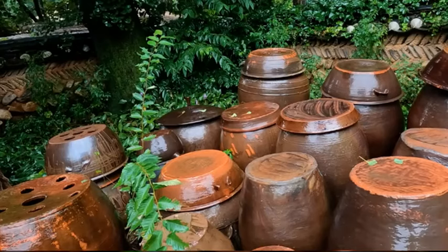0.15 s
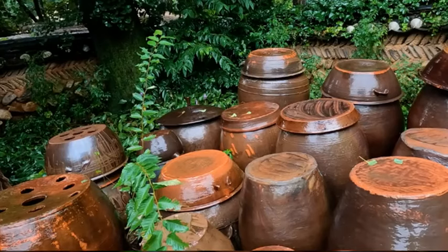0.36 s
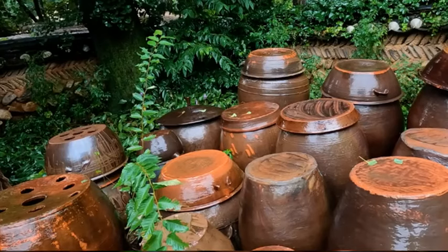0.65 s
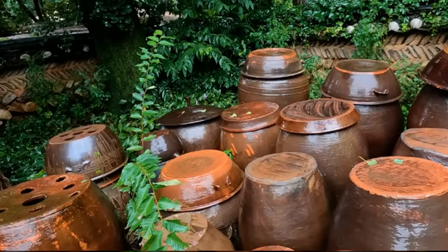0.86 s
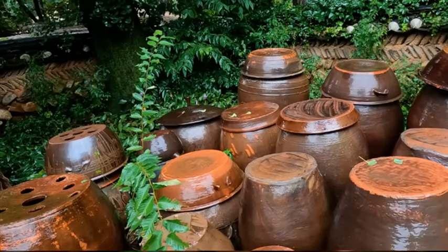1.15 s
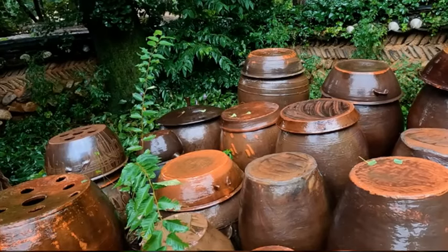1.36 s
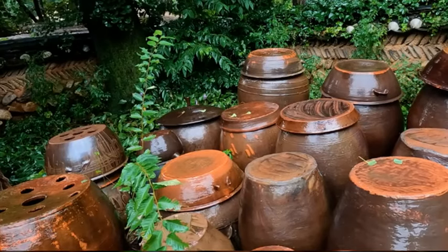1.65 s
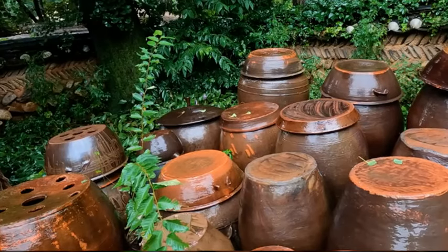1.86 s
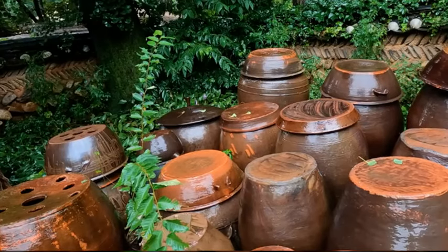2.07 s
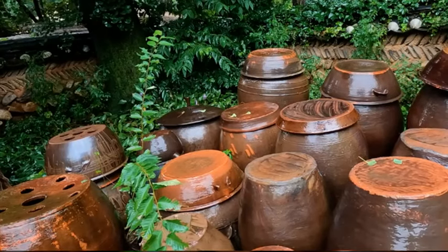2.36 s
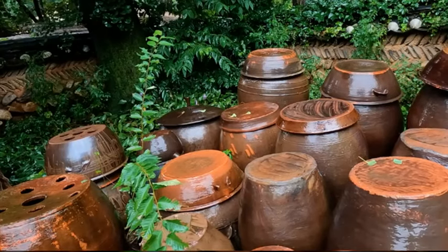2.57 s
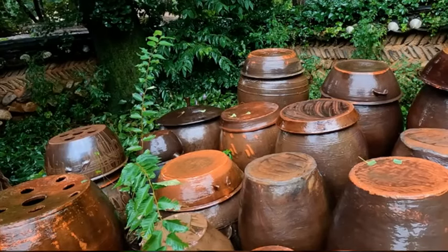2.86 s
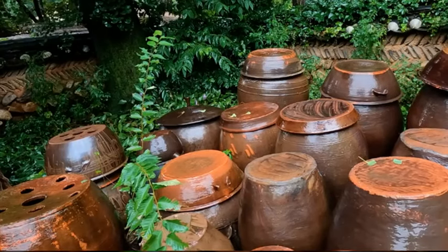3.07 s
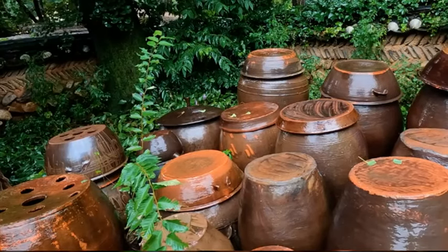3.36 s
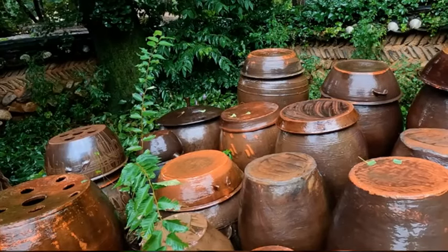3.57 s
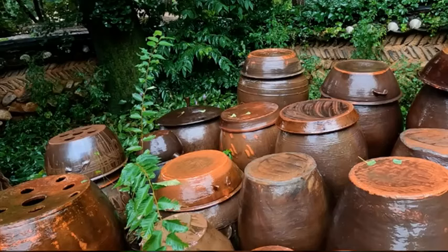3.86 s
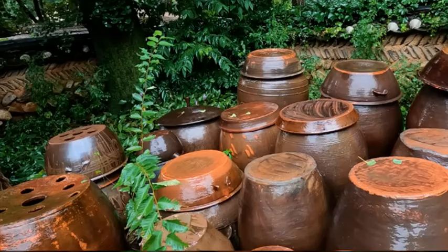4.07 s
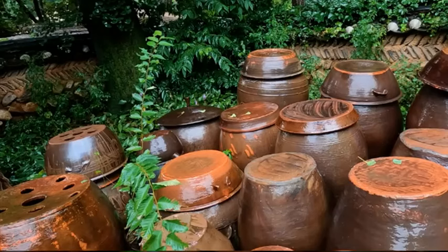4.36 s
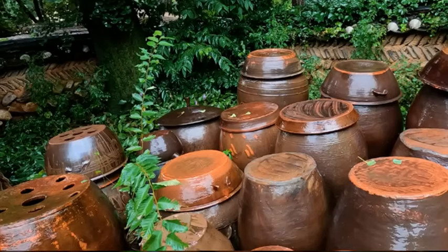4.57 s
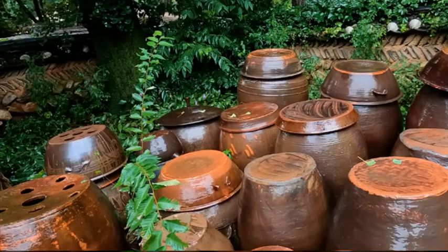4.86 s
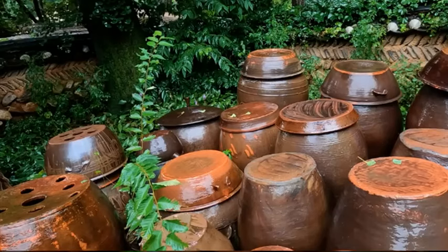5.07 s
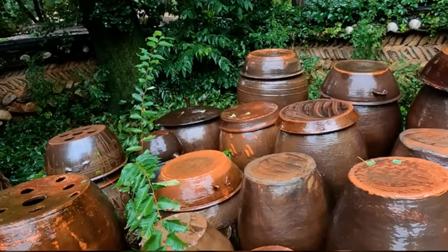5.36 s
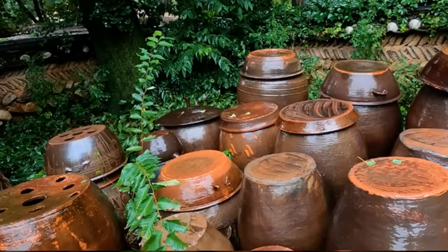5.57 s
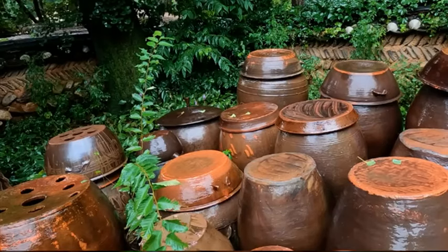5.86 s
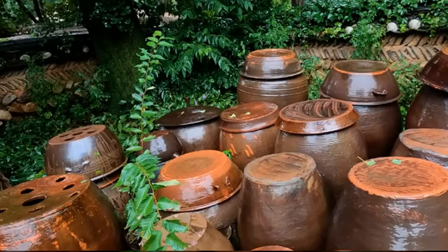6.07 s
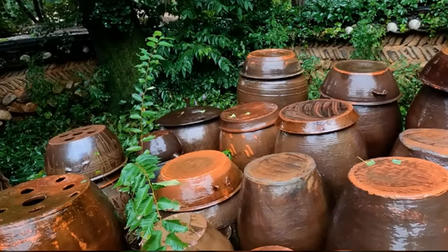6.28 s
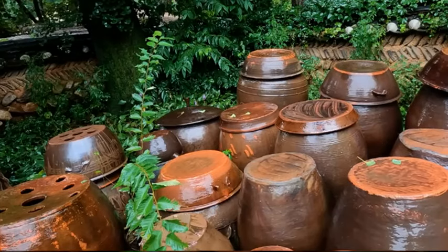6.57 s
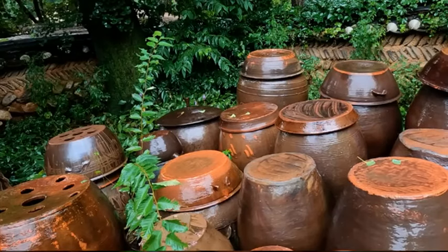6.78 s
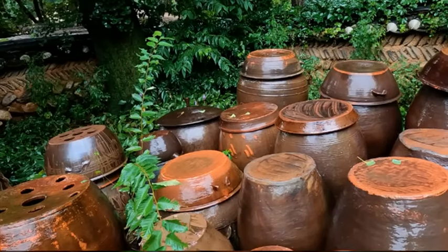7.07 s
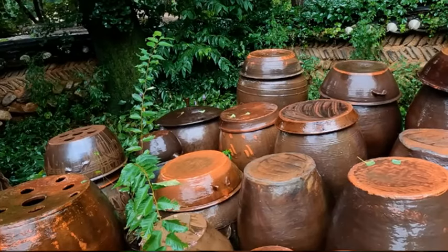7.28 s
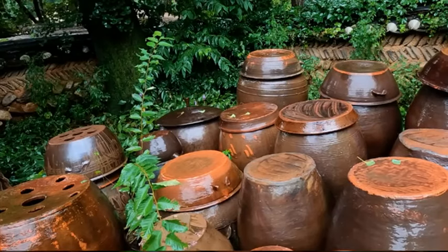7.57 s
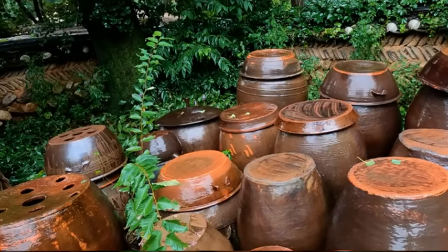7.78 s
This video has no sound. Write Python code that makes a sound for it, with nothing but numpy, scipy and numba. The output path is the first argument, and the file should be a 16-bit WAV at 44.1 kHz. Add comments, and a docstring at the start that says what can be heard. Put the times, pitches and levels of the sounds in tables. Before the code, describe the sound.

For about eight seconds, steady rain falls in a garden of glazed earthenware jars. A broad, even hiss of countless far drops holds nearly constant, overlaid by dense fine crackle on leaves, lids and soil. Close drops tick sharply and irregularly, several per second, each a short dry crack with a tiny knock and a puff of spray; stronger ones land near 0.4, 3.4 and 6.55 s. Trickling water adds small bubble plops, mostly gliding upward, with a clear one at 0.8 s and little splashy clusters near 2.3, 2.9, 3.4, 5.6 and 6.3 s. Soft low thuds come around 4.2, 5.4, 6.4, 7.1 and 7.75 s. A distant low motor hum, faint at first, bumps up at 4.15 s, then swells unevenly from 5.3 s to the end. Wide stereo, close and open, slightly dulled at the very top.

```python
"""A steady hiss of rain runs throughout: far drops merging in a garden of clay jars, heard by a spaced
pair of microphones. Near drops crackle, and tick as short damped rings on wet glaze and leaves; water
that drips and trickles into pools adds bubble plops, mostly gliding up. Low thuds and soft low swells
are three damped tones each. A distant motor, an unsteady tone and rumble, hums low and swells late."""
import sys
import numpy as np
from scipy import signal
from scipy.fft import rfft, irfft
from scipy.io import wavfile
from scipy.ndimage import uniform_filter1d
from numba import njit

SR = 44100
rng = np.random.default_rng(int(sys.argv[2]) if len(sys.argv) > 2 else 0)


def master_out(mix):
    """Clip the mix to full scale and print it as 16-bit PCM to the path in sys.argv[1]."""
    frames = np.transpose(np.atleast_2d(mix))
    ceiling = np.clip(frames, -1, 1)
    pcm = np.round(ceiling * 32767).astype(np.int16)
    wavfile.write(sys.argv[1], SR, pcm)


N = 349713

GLIDE_EASE_S = 0.018  # time constant with which the glide flattens once a ring fades
LEAD_MS_PER_DB = 0.016  # the microphone favoured in level also hears the drop this much earlier


def undb(db):
    """Turn decibels into an amplitude factor."""
    return 10 ** (np.asarray(db) / 20)


def curve(table):
    """Draw straight lines through the timed points of a table, one curve per column."""
    s, *columns = np.transpose(table)
    t = np.arange(N) / SR
    return [np.interp(t, s, c) for c in columns]


def by_hz(table, hz):
    """Read a table of values against frequency, interpolating along log frequency."""
    f, v = np.transpose(table)
    return np.interp(np.log(hz), np.log(f), v)


def walk(rate):
    """Wander at random: levels held 1 / rate s and smoothed twice, with a spread near 1."""
    k = int(SR / rate)
    held = np.repeat(rng.standard_normal(N // k + 1), k)
    smooth = uniform_filter1d(uniform_filter1d(held, k), k)
    return 1.61 * smooth[:N]


def band(lo_hz, hi_hz, channels=2):
    """Filter noise between two edges and scale it to rms 1."""
    sos = signal.butter(2, [lo_hz, hi_hz], "band", fs=SR, output="sos")
    x = signal.sosfilt(sos, rng.standard_normal((channels, N)))
    return x / x.std()


@njit
def ring(start, size, hz, rise, t60, glide, ease):
    """Damped tones that swell for `rise` s, then fade 60 dB in `t60` s; pitch glides in octaves per s."""
    out = np.zeros(N)
    for k in range(len(start)):
        i0, phase = int(start[k] * SR), 0.
        # start off pitch, so that the glide arrives at hz at the peak
        step = 2 * np.pi * hz[k] * 2 ** (-glide[k] * rise[k]) / SR
        up = 2 ** (glide[k] / SR)
        fade = 1000 ** (-1 / (t60[k] * SR))
        g = size[k]
        swell = int(rise[k] * SR) + 1
        for j in range(min(swell + int(t60[k] * SR), N - i0)):
            if j < swell:
                out[i0 + j] += g * np.sin(np.pi * j / swell / 2) * np.sin(phase)
            else:
                g *= fade
                up = 1 + (up - 1) * ease
                out[i0 + j] += g * np.sin(phase)
            phase += step
            step = min(step * up, 2.)
    return out


def grains(s, db, hz, pan_db, rise_ms, t60_ms, glide=0., lag_ms=0.):
    """Place rings between the microphones by level and arrival time; glide in octaves per 10 ms."""
    one = np.ones(len(s))
    ease = np.exp(-1 / (GLIDE_EASE_S * SR))
    rise_s = rise_ms * one / 1000
    t60_s = np.maximum(t60_ms * one, 0.5) / 1000
    octaves_per_s = glide * one * 100
    lag_ms = lag_ms - LEAD_MS_PER_DB * pan_db  # left behind right
    sides = []
    for side in (1, -1):  # left, right
        start = np.clip(s + side * lag_ms / 2000, 0, N / SR)
        size = undb(db + side * pan_db / 2) * one
        sides.append(ring(start, size, hz * one, rise_s, t60_s, octaves_per_s, ease))
    return np.array(sides)


def shower(per_s, db, scatter_db, top_db, lo_hz, hi_hz, cycles, rise_cycles, glide):
    """Scatter random grains all around: many faint, few strong, pitch drawn in octaves about the middle."""
    u = rng.random((int(per_s * N / SR), 6)).T
    hz = lo_hz * (hi_hz / lo_hz) ** ((u[1] + u[2]) / 2)
    size_db = db + np.minimum(-scatter_db * np.log(u[3] + 1e-9), top_db)
    period_ms = 1000 / hz
    place = u[4] - 0.5
    return grains(u[0] * N / SR, size_db, hz, 8 * place, rise_cycles * period_ms, cycles * period_ms,
                  glide * u[5], 1.6 * place)


HUM_HZ, RUMBLE_DB, DEEP_DB = 66.4, -8.5, -11.5  # the rumbles' mean levels are set within the hum
MAINS_HZ, MAINS_DB = 120.6, -63.5  # mean level of the electrical tone
# loudness of the far motor: (time [s], level [dB])
HUM_LEVEL = [(0.0, -74), (0.8, -60), (3.8, -67), (4.08, -62), (4.15, -50), (4.5, -57.5), (5.15, -64),
             (5.33, -47.5), (5.45, -53.5), (5.6, -49), (5.9, -50), (6.15, -46.5), (6.3, -53), (6.45, -44),
             (6.55, -50), (6.9, -45), (7.0, -50), (7.35, -47), (7.55, -51), (7.75, -46), (7.93, -48)]


def hum():
    """A far motor: an unsteady low tone, a faint octave, rumble above and below, a thin electrical tone."""
    hz = HUM_HZ * (1 + 0.03 * walk(14) + 0.01505 * walk(4))
    phase = 2 * np.pi * np.cumsum(hz) / SR
    tone = np.sin(phase) * undb(0.5 + 1.7 * walk(11))
    octave = undb(-19.5) * np.sin(2 * phase)
    rumble = band(69.0, 99, channels=3) * undb(RUMBLE_DB + 1.8 * walk(2.4))
    deep = band(18, 42, channels=1) * undb(DEEP_DB + 3 * walk(4.8))
    mains = undb(MAINS_DB + 3 * walk(0.8)) * np.sin(2 * np.pi * MAINS_HZ * np.arange(N) / SR)
    # one rumble shared by both microphones, one more for each
    motor = tone + octave + deep + rumble[0] + 0.92 * rumble[1:]
    return mains + undb(curve(HUM_LEVEL)[0]) * motor


SLOW_UNEVEN_DB, QUICK_UNEVEN_DB = 1.1, 1.5  # level spread of a band; the quick part is less in low bands
# loudness of the far rain: (time [s], level [dB])
RAIN_LEVEL = [(0.0, -34), (0.7, -34.5), (2.7, -34), (3.7, -34.5), (7.3, -34), (7.93, -35.5)]
# colour of the far rain: (frequency [Hz], relative level per Hz [dB])
HISS_SPECTRUM = [(15, -20.5), (25, -3), (65, -2.5), (286, -4.5), (557, -0.5), (730, -4), (981, -2),
                 (1350, -1), (3710, -9), (5240, -5.5), (6530, -7), (7390, -6.5), (9000, -18.5),
                 (11700, -65), (19800, -120)]
# how alike the microphones hear it: (frequency [Hz], left-right correlation [0-1])
LIKENESS_BY_HZ = [(30, 0.4), (120, 0.84), (300, 0.43), (600, 0), (4000, 0.06), (6200, 0), (7500, 0.8),
                  (9000, 0.94)]


def hiss():
    """Countless far drops: half-octave bands of noise, each band slightly uneven in level."""
    f = np.maximum(np.fft.rfftfreq(N, 1 / SR), 1)
    like = np.clip(by_hz(LIKENESS_BY_HZ, f), -1, 1)
    colour = undb(by_hz(HISS_SPECTRUM, f))
    # shared and opposed parts, weighed for the wanted correlation
    mid = rfft(rng.standard_normal(N)) * colour * np.sqrt(1 + like)
    side = rfft(rng.standard_normal(N)) * colour * np.sqrt(1 - like)
    pair = np.array([mid + side, mid - side])
    out = 0
    for hz in 20 * 2 ** np.arange(0, 9.1, 0.5):
        # neighbouring bands crossfade
        share = np.cos(np.pi / 2 * np.clip(2 * np.log2(f / hz), -1, 1)) ** 2
        uneven_db = SLOW_UNEVEN_DB * walk(12) + QUICK_UNEVEN_DB * min(hz / 2500, 1) * walk(70)
        out = out + irfft(pair * share, N) * undb(uneven_db)
    return out / out.std() * undb(curve(RAIN_LEVEL)[0])


def patter():
    """Small drops on leaves, lids and soil: a dense crackle of very short rings, sharp taps, a few pings."""
    crackle = shower(1800, -42.5, 3.2, 11, 1800, 10500, cycles=19, rise_cycles=1.28, glide=0.1)
    taps = shower(220, -37, 1.9, 6.1, 1800, 10000, cycles=3.9, rise_cycles=0.11, glide=0.1)
    pings = shower(90, -50.0, 2.25, 6.5, 2057, 7740, cycles=27, rise_cycles=2.7, glide=0.087)
    return crackle + taps + pings


LOW_T60_MS = 60  # fade of the lowest part; overtones fade faster
# low thuds and soft low swells: (time [s], level before the part levels [dB], pitch [Hz])
LOW_SOUNDS = [(4.16, -33.5, 77.4), (4.248, -35, 384), (5.415, -36, 310), (6.449, -34, 219),
              (7.098, -26, 209), (7.75, -34, 80)]


def low_thuds_and_swells():
    """Low damped tones with two overtones, alike in both microphones; the deeper, the softer the start."""
    s, db, hz = np.transpose(LOW_SOUNDS)
    parts = [(1, -4), (1.9, -6), (2.9, -8.5)]  # (pitch ratio, level [dB])
    return sum(grains(s, db + part_db, ratio * hz, 0., 1100 / hz, LOW_T60_MS / ratio)
               for ratio, part_db in parts)


BEAD_DB = -4.5  # mean level of one small bubble against its splash
# runs of water that break into small bubbles:
# (time [s], reference level [dB], middle pitch [Hz], length [ms], left minus right before scatter [dB])
SPLASH_RUNS = [(.14, -47, 1740, 22, 2), (1.031, -35, 4210, 12, 11.5), (.815, -35.5, 1115, 130, 1),
               (1.46, -44, 1280, 79, -2), (1.86, -37.5, 1700, 40, -2), (2.29, -34, 1900, 56, 4.5),
               (2.95, -45, 980, 40, 8), (3.378, -33.5, 1300, 35, 6), (4.1, -37, 1080, 88, 3),
               (5.48, -36.5, 1550, 50, -1), (5.57, -32.5, 1540, 76, 3), (6.27, -37, 1280, 52, 3),
               (6.61, -39, 2330, 50, 1)]


def splashes(count=60):
    """Each splash scatters short damped bubble rings over its length and over about two octaves."""
    s, db, hz, length_ms, pan_db = np.repeat(SPLASH_RUNS, count, axis=0).T
    u = rng.random((len(s), 5)).T
    start_s = s + u[0] * length_ms / 1000
    pitch_hz = hz * 2 ** (1.07 * (u[1] + u[2] - 1))
    bead_db = db + BEAD_DB + 8 * (u[3] - 0.5)
    place = u[4] - 0.5
    # stronger beads glide up faster
    return grains(start_s, bead_db, pitch_hz, pan_db + 6 * place, 0.75, 26.0, 0.5 * u[3], 0.47 * place)


def trickle():
    """Trickling water: a dense shower of small bubble rings that glide up."""
    return shower(600, -45.5, 1.2, 5.0, 636.0, 2814, cycles=66, rise_cycles=2.67, glide=0.552)


FADE_CYCLES, FADE_PER_RISE = 18.4, 1.8  # a 60 dB fade lasts so many cycles, plus so many times the rise
# short single-pitch sounds, bubble plops, small ticks and knocks:
# (time [s], level before the flutter [dB], pitch at the peak [Hz],
#   left minus right [dB], rise [ms], glide [octaves per 10 ms])
SINGLE_PITCHES = [(0.1364, -29, 2520, 13.5, 1.7, 0.24), (0.4947, -34, 1050, -7, 8.6, 0.011),
                  (0.777, -32, 1060, 2, 4, 0.33), (0.8102, -15.5, 1290, 10, 1.5, 0.48),
                  (0.827, -29, 1320, 8, 2.7, 0.029), (0.839, -30, 1330, 6, 3, .04),
                  (0.847, -25.5, 1380, 6, 4, -0.015), (0.9, -38, 1330, 8, 4, 0.22),
                  (0.922, -30, 1400, 16, 6.3, -0.053), (1.0113, -29.5, 1490, 0, 1, 0.12),
                  (1.035, -24, 3250, 7, 1.3, 0.91), (1.118, -31.5, 420, -4, 1.5, 0.21),
                  (1.2463, -24, 1200, 4.5, 1.1, 0.22), (1.43, -34, 1200, 0, 5, 0.095),
                  (1.463, -32, 1180, 0, 3, 0.079), (1.482, -27.5, 1037, -2, 3.3, 0.009),
                  (1.489, -27, 1070, -2, 6, 0.18), (1.499, -29, 1345, 0, 4.2, 0.6),
                  (1.6275, -34, 980, -8, 1.8, 0.0017), (1.6765, -30, 2050, 6, 1.2, 0.17),
                  (1.724, -36, 1440, 17, 8, 0.74), (1.8235, -30, 1020, -9, 2.5, 0.3),
                  (1.8601, -25.5, 2060, 16, 2, 0.43), (1.9229, -28, 867, -10, 6.8, -0.014),
                  (1.9466, -27, 1485, 13, 9.4, 0.45), (2.146, -35, 1080, 8, 1.7, .1),
                  (2.267, -32, 2190, 11, 1.5, .1), (2.2896, -24.5, 2090, 10, 1.5, -0.13),
                  (2.301, -34, 1420, 3, 4.4, 0.2), (2.31, -31, 2780, -2, 3, 0.03),
                  (2.318, -38, 1580, 5, 3, 0.12), (2.353, -31, 1870, 0, 3, 0.022),
                  (2.583, -24.5, 1220, 0, 3.4, 0.86), (2.775, -26, 1410, 9, 1.5, .04),
                  (2.792, -22.5, 873, 5, 6.9, 0.0064), (2.8933, -20.5, 747, -4, 3.5, 0.1),
                  (2.9184, -28, 850, -9, 11.6, 0.15), (2.935, -35, 930, -7, 5.6, 0.082),
                  (2.95, -37, 870, -6, 5, .1), (2.972, -34, 930, 0, 5, .2),
                  (3.09, -30, 1540, -1, 1.5, 0.22), (3.3454, -34, 1390, -1, 11, -0.016),
                  (3.39, -26, 1153, 0, 6.83, 1.18), (3.396, -21.5, 1765, -1, 5, 0.57),
                  (3.402, -28, 2020, 0, 6, 0.4), (3.408, -30, 2600, 0, 4.4, 0.65),
                  (3.554, -28, 1720, -3, 1.5, .04), (3.831, -36, 2190, -10, 1.5, .1),
                  (4.0585, -30, 1390, 6, 7.8, 0.084), (4.122, -36, 1310, 0, 6, -0.011),
                  (4.2575, -25, 1800, -6, 1.1, 0.3), (4.366, -31, 1970, 11, 1.5, .1),
                  (4.377, -29, 1790, -9, 1.5, .1), (4.572, -32, 1770, -10, 1.5, .1),
                  (4.632, -27.5, 4800, -10.5, 2.5, 0.033), (4.7341, -27, 1420, 4, 3, -0.066),
                  (4.844, -30, 2070, 13.5, 2.9, .04), (5.15, -35, 810, 9, 2.5, -0.0062),
                  (5.2912, -34, 1250, 6, 1.8, .1), (5.3041, -34, 2110, 20, 3.4, 0.076),
                  (5.3995, -29, 2210, 14, 1.1, 0.52), (5.5214, -29, 2130, 2, 1.9, -0.031),
                  (5.486, -33, 1104, -5, 4, 0), (5.494, -30, 1150, -7, 2, .3),
                  (5.565, -23.5, 1420, 8, 5.4, 0.61), (5.5986, -24.5, 1420, 7, 1.5, 0.05),
                  (5.8514, -31, 882, -10, 13, 0.096), (5.9305, -32, 1900, 20, 1.6, .6),
                  (6.292, -27, 1564, 1, 11, .4), (6.302, -27, 1990, -1, 5.4, 0.57),
                  (6.317, -31, 795, 9, 5, 0.24), (6.336, -35, 780, 4, 8, -0.083),
                  (6.35, -36, 870, 2, 11, 0.064), (6.375, -36, 1150, 4, 5.7, -0.35),
                  (6.622, -27, 1340, 1, 2.8, 0.24), (7.2346, -41, 880, -13, 13, 0.14),
                  (7.3376, -36.5, 746, 12, 6.2, 0.16)]


def single_pitch_sounds():
    """Short single-pitch sounds: bubble plops, small ticks and knocks, each one damped gliding tone."""
    s, db, hz, pan_db, rise_ms, glide = np.transpose(SINGLE_PITCHES)
    flutter = undb(1.2 * walk(300))
    t60_ms = FADE_CYCLES * 1000 / hz + FADE_PER_RISE * rise_ms
    return grains(s, db, hz, pan_db, rise_ms, t60_ms, glide) * flutter


SECOND_T60_MS = 5.5  # fade of the second ring
SPRAY_DB, SPRAY_LATE_S, SPRAY_T60_S = -15, 0.0012, 0.045  # against the crack; just after it; 60 dB fade
# drops that tick close by: (time [s], crack level [dB], crack pitch [Hz], left minus right [dB],
#   cycles to fade 60 dB [count], second ring level [dB re crack], second ring pitch [Hz],
#   contact click level [dB re crack], knock level [dB re crack], knock pitch [Hz])
TICK_DROPS = [(0.009, -26, 3660, 3.5, 18, 5, 6580, -5, -1, 1500),
              (0.115, -26, 6400, 16, 18, -10, 4500.0, -6.0, -17, 1500),
              (0.267, -21, 8750, 6, 20, -8, 6100.0, -6.0, -17, 1500),
              (0.3044, -22.5, 7400, 18, 39, -16, 4100, -17, -5, 800),
              (0.371, -11.5, 4500, -0.5, 23, -5, 3180, -11, -23, 2220),
              (0.3714, -21, 8000, 3, 20, -5, 6000, -10, -20, 2000),
              (0.3973, -18.5, 4800, 0, 45, -14.0, 3000, -14, -15, 1600),
              (0.641, -26, 4900, -16, 27, -9, 3700, -9, -14, 1200),
              (0.8473, -33, 8300, 9, 20, -10, 5800.0, -6.0, -17, 1500),
              (0.6178, -24, 6600, -6, 20, -10, 7950, -6, -12, 1800),
              (0.9953, -29, 7550, 1, 20, -8, 4600, -8, -15, 1500),
              (1.0332, -25, 4670, 12.5, 40, -4, 3600, -13, -12, 2000),
              (1.0498, -29, 4450, 1, 22, -10, 2700, -10, -15, 1500),
              (1.095, -24, 5900, 1, 22, -10, 4500, -8, -15, 1500),
              (1.592, -20.5, 7440, 9, 29, -1, 2600, -5, -4, 990),
              (1.79, -22.5, 6200, 10, 20, -13, 4300.0, -6.0, -17, 1500),
              (2.0754, -17, 6700, -1, 30, -10, 3200, -10, -14, 2100),
              (2.128, -19, 9000, 1, 31, -17, 2400, -8, -7, 1000),
              (2.2904, -25.5, 3230, 13.5, 25, -15, 4800, -11, -15, 2000),
              (2.3153, -22, 7050, 9, 20, -12, 5000, -8, -7, 1500),
              (2.4853, -31, 5700, 16, 25, -4.0, 7400, -6.0, -8, 900),
              (2.632, -24.5, 7000, 20.5, 28, -6, 5300, -6, 1, 1700),
              (2.6692, -23, 5580, 6.5, 25, -6, 7000, -8, -15, 1500),
              (2.797, -23, 7300, 1, 25, -3.0, 5500, -13, -11, 900),
              (2.9811, -20, 5300, 11, 34, -2, 2500, -8, -10, 1070),
              (3.0733, -25, 7300, 15, 20, -10, 5100.0, -6.0, -2, 1900),
              (3.1438, -22, 7100, -8.5, 25, -4.5, 5500, -11, -8, 1600),
              (3.1997, -29, 3360, 8, 20, -6, 4500, -8, -12, 1500),
              (3.271, -20.5, 4740, -13.5, 28, -18, 7600, -15, -8, 1200),
              (3.4212, -15.5, 6000, -8.5, 15, -13, 7600, -10, -4, 1810),
              (3.4474, -24, 5520, -10, 28, -4, 6800, -6, -15, 1500),
              (3.536, -21, 6600, 1.5, 27, -9.0, 2300, -6.0, -10.0, 2200),
              (3.6658, -25, 7400, -0.5, 25, -10, 4400, -8, -17, 900),
              (3.677, -24, 3360, 14.0, 45, -14.0, 4800, -14, -16.0, 1900),
              (3.902, -23, 8500, -7, 29, -2, 4700, -5, -15, 1500),
              (4.0764, -28, 7030, -5, 20, -10, 5000, -8, -15, 1500),
              (4.2035, -25, 3900, 12.0, 25, 1, 6300, -6.0, -10, 1200),
              (4.219, -22, 4000, 10.5, 45, -16, 6300, -12, -12, 1000),
              (4.3715, -26, 8500, -7, 20, -10, 6000.0, -6.0, -15, 1500),
              (4.6617, -30.0, 5000, 6, 20, -10, 3500.0, -6.0, -15, 1500),
              (4.803, -24, 6600, 9, 20, -10, 4600.0, -3, -15, 1500),
              (5.2766, -22, 4630, 6.5, 25, -12, 6000, -10, -15, 1500),
              (5.3242, -23, 6280, 1, 20, -10, 4500, -8, -15, 1500),
              (5.369, -17, 5970, 0.5, 20, -4, 4800, -5, -18, 1300),
              (5.568, -26, 8600, 13.5, 20, -13, 6000.0, -6.0, -15, 1500),
              (5.8743, -23, 6900, 2, 29, -1, 8000, -6.0, -10.0, 1600),
              (6.1836, -17, 6600, 9.5, 30, -17.5, 2400, -6, -19, 1800),
              (6.2787, -21.5, 4440, -1, 25, -2, 2890, -6.0, -4, 2000),
              (6.4274, -32, 4300, 2, 25, 4, 2300, -6.0, 14, 1300),
              (6.4582, -17, 5500, 17.5, 27, -4, 4500, -6, -9.5, 1120),
              (6.5503, -11.5, 7000, 0.5, 14, -18, 4570, -7, -0.5, 1940),
              (6.604, -19.5, 6800, 9.5, 27, -4, 3600, -12, -12, 1900),
              (6.622, -17.5, 4230, 5, 25, -6, 5600, -4, -7.5, 1700),
              (6.636, -24, 5300, -2, 22, -10, 4000, -8, -15, 1500),
              (6.7522, -23, 4290, -3.5, 25, -10, 6000, -8, -15, 1500),
              (6.9878, -32.0, 8000, -19, 20, -8, 5600.0, -4, -15, 1500),
              (7.0521, -21, 5360, 14, 20, -3, 6600, -8, -7, 800),
              (7.1028, -24, 5500, 14, 23, -6.5, 2300, -6.0, -7, 1730),
              (7.1344, -30, 8000, 15, 25, -10.5, 2800, -6.0, -10, 1100)]


def ticks():
    """A drop cracks on a hard wet surface, rings it at two pitches, knocks it and breaks into spray."""
    s, db, hz, pan_db, cycles, second_db, second_hz, edge_db, knock_db, knock_hz = np.transpose(TICK_DROPS)
    crack = grains(s, db, hz, pan_db, 0.25, cycles * 1000 / hz)
    second = grains(s, db + second_db, second_hz, pan_db, 0.35, SECOND_T60_MS)
    # the instant of contact: very short rings above and below the crack
    edge = sum(grains(s, db + edge_db, ratio * hz, pan_db, 0.06, 1.6) for ratio in (1.2, 0.6))
    knock = grains(s, db + knock_db, knock_hz, pan_db, 0.38, 5.3)
    low_knock = grains(s, db + knock_db - 8.5, 0.68 * knock_hz, pan_db, 0.31, 3.9)
    puffs = np.zeros((2, N))
    landing = ((s + SPRAY_LATE_S) * SR).astype(int)
    puffs[:, landing] = undb(db + SPRAY_DB + np.array([pan_db, -pan_db]) / 2)
    fade = 1000 ** (-1 / (SPRAY_T60_S * SR))
    # the spray is a rough cloud of droplets, not a smooth hiss
    droplets = band(2000, 7500) * undb(1.5 * walk(600))
    spray = signal.lfilter([1], [1, -fade], puffs) * droplets
    return crack + second + edge + knock + low_knock + spray


def scene():
    """Layer the garden from the far motor to the near drops."""
    far = hum() + hiss() + patter()
    water = low_thuds_and_swells() + splashes() + trickle() + single_pitch_sounds()
    return far + water + ticks()


TOP_HZ = 8950  # upper edge of the recorder


def record(dry):
    """The recorder cuts the top steeply without delaying it, by filtering forwards and backwards."""
    sos = signal.cheby1(12, 0.25, TOP_HZ, fs=SR, output="sos")
    return signal.sosfiltfilt(sos, dry)


dry = scene()
out = record(dry)
master_out(out)
```